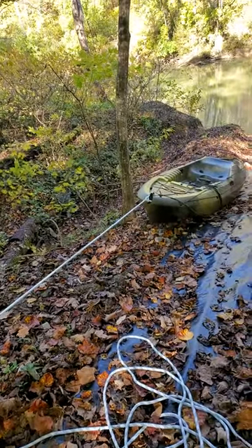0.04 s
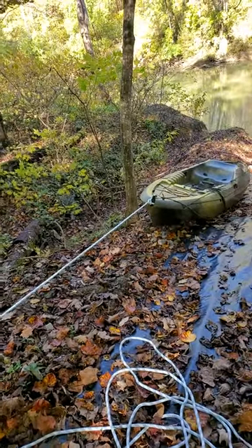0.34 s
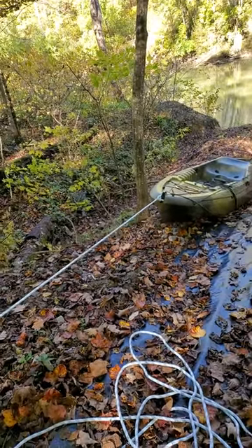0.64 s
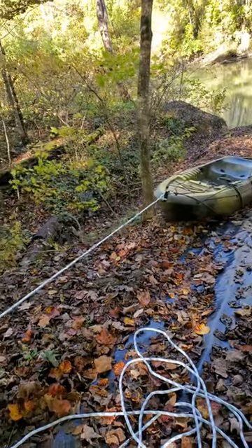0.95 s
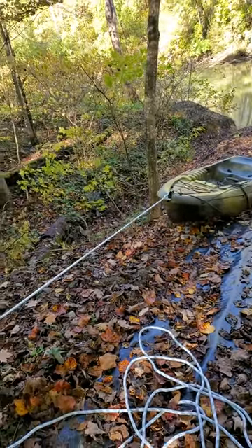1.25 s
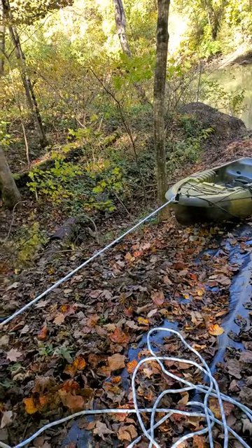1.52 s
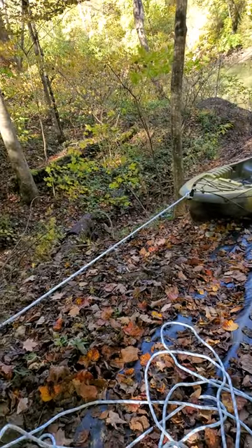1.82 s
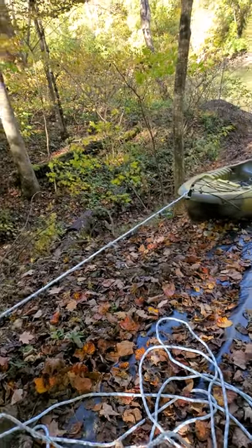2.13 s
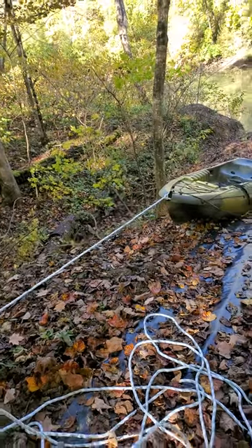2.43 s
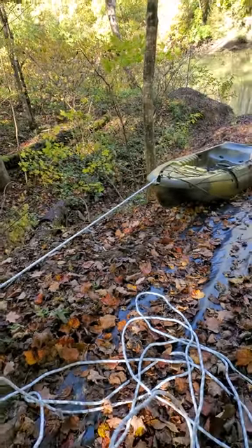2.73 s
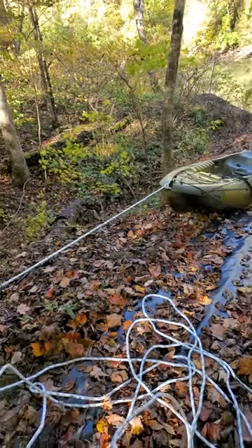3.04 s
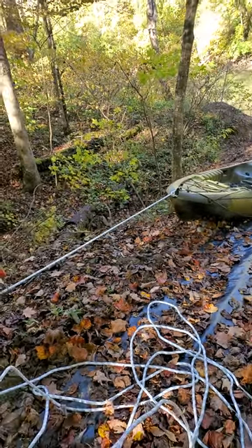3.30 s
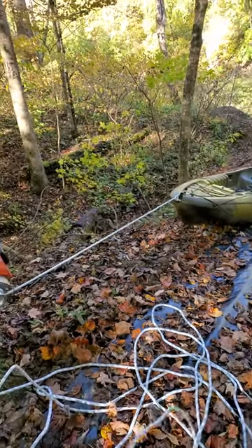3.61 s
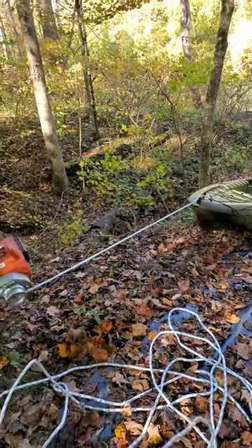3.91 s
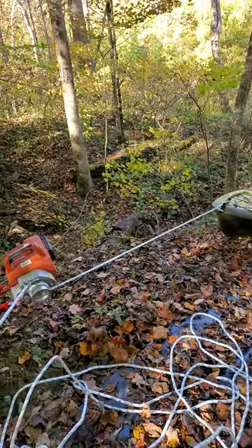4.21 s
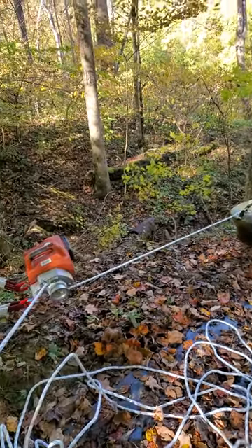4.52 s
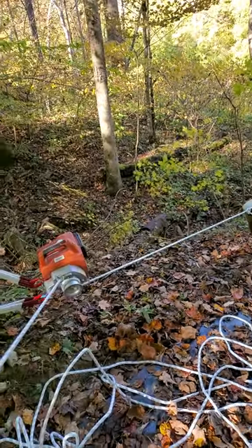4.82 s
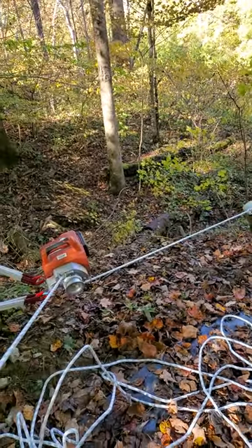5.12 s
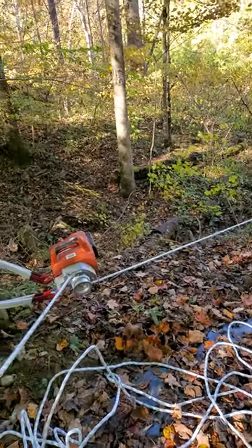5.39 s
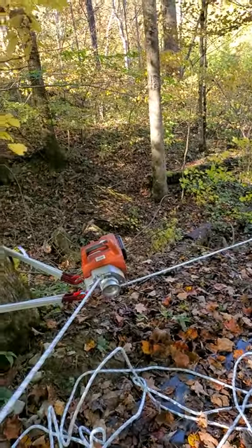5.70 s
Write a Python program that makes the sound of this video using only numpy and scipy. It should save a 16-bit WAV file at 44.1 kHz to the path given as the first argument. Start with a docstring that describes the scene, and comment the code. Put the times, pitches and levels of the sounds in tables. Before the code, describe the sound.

A battery winch runs throughout with a steady, throbbing whine and rasping gears as it hauls a boat up a creek bank. Midway the hull rubs faintly over the ground, the rope squeaks twice, the drum squeals thinly and a step crunches dry leaves and twigs. Light wind bumps the nearby hand-held microphone, and the whine shifts in tone as it turns toward the winch.

```python
"""A steady, throbbing whine: a battery capstan winch is hauling a boat up a leafy creek bank.
Its spinning rotor whines, its gears rasp once a turn and throb under the load, and a slower stage hums.
Midway the hull rubs over the ground, the rope squeaks, the drum squeals and a step crunches dry leaves.
The hand-held microphone swings round towards the winch while gusts buffet its two openings (ports)."""
import sys
import numpy as np
from scipy import signal
from scipy.fft import rfft, irfft
from scipy.io import wavfile
from scipy.ndimage import map_coordinates

SR = 44100
rng = np.random.default_rng(int(sys.argv[2]) if len(sys.argv) > 2 else 0)


def store_wav(level_fs):
    """Save 16-bit WAV to argv[1]."""
    pcm = np.round(np.clip(np.atleast_2d(level_fs), -1, 1) * 32767)
    wavfile.write(sys.argv[1], SR, pcm.T.astype(np.int16))


N = 253575
TIME = np.arange(N) / SR
FREQS = np.maximum(np.arange(N // 2 + 1) * SR / N, 1)
PAN = np.array([[.5], [-.5]])  # half goes to the left side, half is taken from the right


def from_db(db):
    """Turn decibels into a gain."""
    return 10 ** (np.asarray(db) / 20)

def rms_one(x):
    """Scale a signal to an average strength (rms) of 1."""
    return x / np.sqrt(np.mean(np.abs(x) ** 2) + 1e-20)

def in_time(rows):
    """Join a table's points over time, giving one curve per column."""
    times, *columns = np.transpose(rows)
    return [np.interp(TIME, times, column) for column in columns]

def by_hz(points):
    """Join a table's points over frequency."""
    hz, value = np.transpose(points)
    return np.interp(np.log(FREQS), np.log(hz), value)

def filtered(x, response):
    """Multiply each frequency of a signal by its own gain."""
    return irfft(rfft(x) * response, N)

def coloured(x, colour):
    """Give a signal the tone colour in a table, at strength 1."""
    return rms_one(filtered(x, from_db(by_hz(colour))))

def delayed(x, samples):
    """Delay a signal by an amount that changes over time."""
    return map_coordinates(x, [np.arange(N) - samples], order=3, mode="mirror")

def drift(rate):
    """A smooth random wander of strength 1; rate is roughly its changes per second."""
    r = np.exp(-40 * np.pi * rate / SR)
    slow = signal.lfilter([1], [1, -2 * r, r * r], rng.standard_normal(N // 20 + 2002))[2000:]
    return np.interp(np.arange(N) / 20, np.arange(len(slow)), rms_one(slow))

def swell(peak_s, half_width_s):
    """A rounded rise and fall of height 1."""
    return np.exp(-.5 * ((TIME - peak_s) / half_width_s) ** 2)

def swells(rows):
    """Add several swells into one loudness curve."""
    return sum(from_db(db) * swell(peak_s, half_width_s) for peak_s, half_width_s, db in rows)

def resonant_noise(hz, width_hz):
    """Stereo noise that rings around one pitch, at strength 1."""
    r = np.exp(-np.pi * width_hz / SR)
    feedback = [1, -2 * r * np.cos(2 * np.pi * hz / SR), r * r]
    return rms_one(signal.lfilter([1, 0, -1], feedback, rng.standard_normal((2, N))))


# Tone colour of air on the ports: frequency_hz, level_db
WIND_COLOUR = [(12, -26), (25, -7), (42, -3.5), (68, 1.5), (100, -3), (140, -10), (300, -53), (1000, -72)]
# Gusts: peak_s, half_width_s, level_db
WIND_GUSTS = [(.26, 0.031, -48), (.4, 0.067, -53), (.97, 0.019, -48), (1.8, 0.058, -46.5),
              (1.97, 0.047, -45), (2.27, 0.044, -41), (2.52, 0.038, -40), (2.69, 0.025, -36),
              (2.79, 0.03, -43), (3.09, 0.028, -48), (3.42, 0.076, -44.5), (3.6, 0.03, -34),
              (3.7, 0.058, -41.5), (3.79, 0.027, -44), (3.88, 0.018, -39), (3.99, .04, -51),
              (4.2, 0.044, -44), (4.34, 0.054, -51)]

def wind(breeze_db, flutter_db):
    """A light breeze and its gusts rumble in each port separately."""
    rumble = coloured(rng.standard_normal((2, N)), WIND_COLOUR)
    flow = from_db(breeze_db) + swells(WIND_GUSTS)
    return flow * from_db(flutter_db * drift(8)) * rumble


# Deep tone colour of a thump: frequency_hz, level_db
WIND_THUMP_COLOUR = [(15, -25), (32, -4), (48, 0), (70, -2), (100, -16), (200, -50), (500, -85)]
# Strong gusts: peak_s, half_width_s, level_db
WIND_THUMPS = [(2.245, .018, -36), (2.3, .02, -36), (2.59, .025, -33), (3.55, .015, -33), (3.61, .016, -28)]

def wind_thumps():
    """The strongest gusts hit the ports as short, deep thumps."""
    return swells(WIND_THUMPS) * coloured(rng.standard_normal((2, N)), WIND_THUMP_COLOUR)


# Hollow tone colour of the hull: frequency_hz, level_db
HULL_COLOUR = [(250, -39), (420, 8), (520, -1), (750, 5), (1000, -6), (1600, -13.5)]
# Drags over the bank: peak_s, half_width_s, level_db
HULL_DRAGS = [(2.151, 0.18, -34.5), (2.75, 0.24, -36.5)]

def hull_rub(uneven_db):
    """The boat's hull rubs unevenly over the ground."""
    rub = rng.standard_normal((2, N)) * from_db(uneven_db * drift(25))
    return swells(HULL_DRAGS) * coloured(rub, HULL_COLOUR)


# Tone colour of dry leaves: frequency_hz, level_db
CRACKLE_COLOUR = [(150, -7), (600, -12), (1900, 1), (3300, 0.5), (5000, 1), (8000, 0), (12000, -3),
                  (15500, 4.5)]

def leaves(step_s, step_db, stir_db, crackles_per_s, grain_db, clump_db):
    """Dry leaves stir faintly, then crush under a step in clumps of tiny crackles."""
    sizes = from_db(grain_db * np.minimum(rng.exponential(1, (2, N)), 4) + clump_db * drift(36))
    cracks = (rng.random((2, N)) < crackles_per_s / SR) * rng.choice([-1, 1], (2, N))
    rise_s, hold_s, fall_s = 0.071, 0.14, 0.26
    step = np.interp(TIME, step_s + np.cumsum([0, rise_s, hold_s, fall_s]), [0, 1, 1, 0])
    return (from_db(stir_db) + from_db(step_db) * step) * coloured(sizes * cracks, CRACKLE_COLOUR)


# Breaking twigs: start_s, level_db, pitch_hz
TWIG_SNAPS = [(2.758, -26, 13000), (2.843, -24, 12000), (2.908, -26, 2600), (2.911, -17, 13500),
              (2.9177, -14.5, 2300), (3.108, -20, 13500), (3.288, -19, 13000)]

def twig_snaps(fade_s):
    """Twigs and stalks break, each with a burst that falls 60 dB in fade_s."""
    out = 0
    for start_s, db, hz in TWIG_SNAPS:
        decay = (TIME >= start_s) * from_db(db - 60 * np.maximum(TIME - start_s, 0) / fade_s)
        out = out + decay * resonant_noise(hz, width_hz=2200)
    return out


# Slips of the rope: peak_s, half_width_s, level_db
ROPE_SLIPS = [(2.687, 0.01, -25), (3.076, 0.0079, -26)]

def rope_squeaks():
    """The rope squeaks as it slips briefly on the drum."""
    return swells(ROPE_SLIPS) * resonant_noise(hz=6280, width_hz=210)


# Notes at which the drum rings: pitch_hz, width_hz, level_db
DRUM_NOTES = [(6250, 60, -50), (6760, 55, -43), (7180, 55, -51), (6950, 70, -41)]

def drum_squeal(load_db, peak_s, half_width_s):
    """The loaded drum squeals for a while, pulsing with the load."""
    ringing = sum(from_db(db) * resonant_noise(hz, width)[0] for hz, width, db in DRUM_NOTES)
    return ringing * swell(peak_s, half_width_s) * from_db(load_db)


def gear_hum(turns, speed_ratio, level_db, pan_db, waver_db, sum_tone_db):
    """A slower gear stage hums, with a faint extra tone at its own pitch plus the rotor's."""
    angle = 2 * np.pi * turns
    tone = np.sin(speed_ratio * angle) + from_db(sum_tone_db) * np.sin((1 + speed_ratio) * angle)
    return np.sqrt(2) * tone * from_db(level_db + waver_db * drift(9.9) + pan_db * PAN)


# Overlapping cycles in the load make the gears throb and chatter: period_turns, depth_db, first_peak_turns
LOAD_CYCLES = [(47.96, 1.3, 25.4), (15.98, .66, 1.45), (34.28, .6, 29.9), (50.99, .5, 33.7),
               (16.06, .43, 15.4), (54.76, .33, 37.3), (19.98, .31, 5.6), (25.54, .28, 4.3), (8.01, .26, 3)]
# The teeth catch with a short chirr: peak_s, extra_load_db
TOOTH_CATCHES = [(.026, 2.5), (.076, 2.2), (.247, 5.5), (.298, 3.5), (.476, 3), (.649, 2.5), (.742, 4.5),
                 (1.079, 5), (1.178, 2.8), (1.263, 2), (1.405, 2), (1.438, 1), (1.497, 3), (1.832, 1),
                 (1.927, 3), (2.152, 2.5), (2.382, -2), (2.419, 2), (3.112, 0), (3.676, 1), (3.829, 5),
                 (4.983, 4), (5.521, 4), (5.585, 5.5)]

def gear_load(turns, uneven_db):
    """The load on the gears in dB around its average; each winch sound follows a share of it."""
    cycles = sum(db * np.cos(2 * np.pi * (turns - first) / period) for period, db, first in LOAD_CYCLES)
    bite = 0.04 * cycles ** 2  # teeth bite harder than they let go
    catches = sum(db * swell(peak_s, half_width_s=0.009) for peak_s, db in TOOTH_CATCHES)
    load_db = cycles + bite + catches + uneven_db * drift(21)
    return load_db - load_db.mean()


# How alike the two sides sound: frequency_hz, likeness_0_to_1
STEREO_LIKENESS = [(250, 1), (500, 0.81), (900, 0.98), (2500, 0.8), (4000, 0.73), (7000, 0.64),
                   (11500, 0.74), (14000, 0.45)]
# How much louder the left side is: frequency_hz, left_minus_right_db
STEREO_BALANCE = [(150, 5.5), (300, -5), (480, 7), (850, -7), (1500, -1), (2300, -3.5), (4500, -4.5),
                  (5300, 0), (7200, -0.5), (8200, 5.5), (9500, -1), (12500, -4), (14500, 6)]
# How much noise repeats from turn to turn: frequency_hz, share_0_to_1
TURN_REPEAT = [(300, .1), (1000, .12), (2200, .25), (2600, .33), (3000, .27), (3800, .34), (4700, .28),
               (5600, .3), (6500, .12), (15000, .1)]
# Pitches the housing boosts or dulls: pitch_hz, width_hz, boost_db
HOUSING_RESONANCES = [(679, 33, 9), (836, 9, 7), (1042, 200, 6), (1517, 230, 6), (2260, 270, 5),
                      (2830, 78, 2), (3810, 940, 6), (5552, 130, 7.5), (6100, 120, -2), (6245, 130, 7),
                      (6830, 160, 8), (6960, 190, 3), (7250, 92, 9), (11220, 220, 3), (11620, 270, 2.5),
                      (14000, 290, -18)]

def tooth_scrape(turns, colour, swell_db, pulse_db, uneven_db, pan_db):
    """Teeth scrape hardest once a turn, each turn with its own strength, and sound through the housing."""
    angle = 2 * np.pi * turns
    pulse = pulse_db * (np.cos(angle) + 0.3 * np.cos(2 * angle))
    strength = uneven_db * rng.standard_normal(N)[(turns + .5).astype(int)]
    shared, opposed = rfft(rng.standard_normal((2, N)) * from_db(pulse + strength + swell_db))
    alike = by_hz(STEREO_LIKENESS)
    pair = np.sqrt(1 + alike) * shared + np.sqrt(1 - alike) * opposed * [[1], [-1]]
    # The same teeth meet on every turn, so the noise gathers round the rotor's harmonics.
    turn_s = TIME[-1] / turns[-1]
    comb = 1 / (1 - by_hz(TURN_REPEAT) * np.exp(-2j * np.pi * FREQS * turn_s))
    housing_db = sum(db / (1 + (2 * (FREQS - hz) / width) ** 2) for hz, width, db in HOUSING_RESONANCES)
    gain = from_db(by_hz(colour) + housing_db + (by_hz(STEREO_BALANCE) + pan_db) * PAN)
    return rms_one(irfft(pair * comb * gain, N))


# Tone colours of the four gear noises: frequency_hz, level_db
GRIND_COLOUR = [(100, -24.5), (190, -9.5), (260, 1.5), (330, -3.5), (430, -2), (520, -3.5), (680, 0),
                (1000, -3.5), (1550, 5), (1950, -0.5), (2800, 4.5), (3900, 0.5), (4900, 0), (6000, -11.5)]
RASP_COLOUR = [(3000, -18.5), (5200, -13.5), (6100, -1), (7000, -2.5), (7700, -1.5), (8700, -7),
               (10500, -15.5)]
SIZZLE_COLOUR = [(7300, -16.5), (8200, -2), (9500, 3), (12500, 1), (14000, 9.5), (16000, -4)]
DRUM_COLOUR = [(8000, -25), (10100, -4), (11100, -3), (11600, -0.5), (12100, -6.5), (13000, -34),
               (14000, -39)]
# How each rises and falls: time_s, grind_db, rasp_db (before its trim), sizzle_db, drum_db
GEAR_LEVELS = [(0, -23, -19.5, -28.5, -26), (.5, -24, -23, -28.5, -25), (1.7, -24, -19, -27, -28),
               (2.8, -25.5, -23.5, -29, -28.5), (3.6, -25.5, -21.5, -26.5, -30.5),
               (4.5, -26.5, -23.5, -29, -37), (5, -26.5, -21, -29.5, -49), (5.75, -25.5, -21, -29.5, -46)]

def gear_train(turns, load_db):
    """Low grind, shrill rasp, fine sizzle and the ringing drum all swell with the load."""
    grind_db, rasp_db, sizzle_db, drum_db = in_time(GEAR_LEVELS)
    grind = tooth_scrape(turns, GRIND_COLOUR, 0.18 * load_db + 0.35 * drift(36),
                         pulse_db=0.84, uneven_db=1.27, pan_db=0.3)
    rasp = tooth_scrape(turns, RASP_COLOUR, 0.3 * load_db + drift(40),
                        pulse_db=3.0, uneven_db=1.15, pan_db=-1.2)
    sizzle = tooth_scrape(turns, SIZZLE_COLOUR, 1.17 * load_db + drift(70),
                          pulse_db=0.5, uneven_db=2.0, pan_db=-5.0)
    drum = tooth_scrape(turns, DRUM_COLOUR, 1.35 * load_db + 0.69 * drift(70),
                        pulse_db=3.5, uneven_db=1.0, pan_db=-3.0)
    treble = from_db(rasp_db - 2.5) * rasp + from_db(sizzle_db) * sizzle
    return from_db(grind_db) * grind + treble + from_db(drum_db) * drum


# Echo off the ground: time_s, delay_ms
GROUND_ECHO = [(0, 4.83), (2.6, 4.58), (3.2, 4.9), (5.75, 4.85)]

def with_ground_echo(pair, echo_db):
    """One quick bounce off the ground strengthens some pitches and weakens others."""
    samples = in_time(GROUND_ECHO)[0] * SR / 1000
    return pair + from_db(echo_db) * np.array([delayed(side, samples) for side in pair])


# Extra lag at the left port: frequency_hz, lag_radians
LEFT_PORT_LAG = [(150, 0), (195, 0), (250, 0.58), (420, 1.6), (700, 0.87), (2000, 0.68), (4000, 0)]

def at_microphone(pair, lag_samples):
    """The winch stands to one side, so its sound reaches the left port later."""
    left = filtered(pair[0], np.exp(-1j * by_hz(LEFT_PORT_LAG)))
    return np.array([delayed(left, lag_samples), pair[1]])


# How far the microphone has moved: time_s, distance_cm
MICROPHONE_PATH = [(0, -0.5), (.45, 1), (.85, 3.5), (1.5, 5.5), (2, 10.5), (2.7, 14), (3.3, 17.5),
                   (4.2, 19), (5, 21), (5.75, 21.5)]
# Loud spots in the air: harmonic, spacing_cm, left_depth_db, right_depth_db, left_spot_cm, right_spot_cm
STANDING_WAVES = [(1, 9.0, 1.5, 2.2, 8.1, 2.1), (2, 10.4, 3.0, 1.9, 8.7, 9.6),
                  (3, 12.6, 2.8, 2.3, 8.9, 11.5), (4, 7.6, 2.4, 1.9, 4.6, 4.8),
                  (5, 8.8, 1.6, 0.6, 1.7, 8.6), (6, 8.0, 1.5, 3.0, 3.0, 4.1),
                  (7, 17.6, 2.1, 1.2, 3.5, 12.6), (8, 10.8, 1.8, 2.1, 7.8, 8.1),
                  (9, 5.2, 1.0, 2.0, 1.9, 0.9), (10, 12.8, 2.0, 2.3, 9.0, 5.4),
                  (11, 9.0, 1.3, 1.1, 7.2, 6.0), (12, 10.6, 1.6, 0.8, 8.6, 7.7),
                  (13, 7.4, 1.5, 0.4, 2.7, 5.7), (14, 8.4, 0.9, 1.3, 6.2, 7.1)]

def standing_wave_db(harmonic):
    """A harmonic swells as each port moves through the loud spots of its standing wave."""
    path_cm, = in_time(MICROPHONE_PATH)
    _, spacing_cm, *ports = STANDING_WAVES[harmonic - 1]
    depth_db, spot_cm = np.reshape(ports, (2, 2, 1))
    return depth_db * np.cos(2 * np.pi * (path_cm - spot_cm) / spacing_cm)


# Brief swells and dips: harmonic, peak_s, half_width_s, left_db, right_db
HARMONIC_SWELLS = [(1, 3.16, 0.28, 2, -6), (1, 4.43, 0.44, 5.5, 3.5), (2, 2.02, 0.17, 5, 4),
                   (3, 2.3, .12, 0.5, -8), (3, 5.43, 0.32, 4, 3.5), (4, 0.91, 0.34, 9, 7),
                   (4, 2.2, .2, -1, 0), (4, 2.9, 0.26, 11, 11.5), (5, 2.75, 0.26, -4.5, 4),
                   (6, 0.4, 0.22, 1, -1), (6, 2.9, 0.12, -5, -10), (7, 3.39, 0.29, -1, 9.5),
                   (8, 4.1, 0.25, 4, 12.5), (6, 2.3, 0.29, 1, 6.5), (9, 0.16, 0.3, 7, 10.5),
                   (2, .7, .6, -1.5, -2), (13, 4.3, .4, 11.5, 8)]

def harmonic_swell_db(harmonic):
    """Single tones of the whine briefly swell or dip on each side."""
    return sum(np.outer(sides_db, swell(peak_s, half_width_s))
               for number, peak_s, half_width_s, *sides_db in HARMONIC_SWELLS if number == harmonic)


# Rotor tones (harmonics: multiples of its speed) before and after the microphone swings: harmonic,
# left_before_db, right_before_db, left_after_db, right_after_db, lag_before_radians, lag_after_radians
ROTOR_HARMONICS = [(1, -40, -43.5, -44.5, -45.5, 4, 0.3), (2, -48.5, -37.5, -46, -37.5, 2, 1),
                   (3, -37.5, -36.5, -48, -36, 3.5, 1.2), (4, -44, -40.5, -43, -43.5, 2, 1.6),
                   (5, -37, -32, -38, -32.5, 3.5, 2), (6, -31, -39, -37.5, -33.5, 4, 1.4),
                   (7, -38.5, -44, -47, -35.5, -3, -5), (8, -37, -41, -41, -41, -1.3, -4.5),
                   (9, -38, -38.5, -46, -43, -1.66, -2), (10, -46, -36.5, -42, -42, -1, -2),
                   (11, -52, -46, -51, -40, -2, -1.5), (12, -42, -54, -54, -51, 0, 1),
                   (13, -37.5, -50, -48.5, -49, -0.5, -1), (14, -43, -46, -40, -45, -0.8, -0.8)]
# Gear wheels that shake the tones: period_turns, relative_depth
SHAKING_WHEELS = [(48, .2), (24, .17), (16, .26), (8, .12), (7.59, .16)]
# Throb from the carrier of the planet gears, for harmonics 1, 2, 3 and all higher: depth_0_to_1
THROB_DEPTHS = [.35, .72, .35, .1]
TURNS_PER_THROB, TURNS_PER_WOBBLE = 48, 16

def rotor_whine(turns, swing, load_db, boost_db, flutter, shimmer_db, wobble):
    """The rotor whines; the carrier makes low tones throb, while wheels, slack and grit roughen high ones."""
    out = np.zeros((2, N))
    carrier = np.exp(-2j * np.pi * (turns / TURNS_PER_THROB - .73))
    wheels = [depth * np.exp(2j * np.pi * turns / period) for period, depth in SHAKING_WHEELS]
    for harmonic, *levels, lag_before, lag_after in ROTOR_HARMONICS:
        before, after = np.reshape(levels, (2, 2, 1))
        tone_db = before + swing * (after - before)
        tone_db += standing_wave_db(harmonic) + harmonic_swell_db(harmonic)
        left_lag = lag_before + swing * (lag_after - lag_before)
        ports = [np.exp(-1j * left_lag), 1]
        # Each wheel adds a side tone just above and just below the harmonic.
        phases = np.exp(2j * np.pi * rng.random((len(wheels), 2)))
        side_tones = sum(up * wheel + down * wheel.conj() for wheel, (up, down) in zip(wheels, phases))
        shake = wobble * harmonic ** 0.22 * side_tones
        # The planet gears shift two harmonics down to a side tone.
        multiple = harmonic - (harmonic in (12, 13)) / TURNS_PER_WOBBLE
        tone = np.exp(2j * np.pi * (multiple * turns + rng.random()))
        throb = THROB_DEPTHS[min(harmonic, len(THROB_DEPTHS)) - 1] * carrier
        grit = .1 * (harmonic - 1) * (drift(90) + 1j * drift(90))
        slack = flutter * harmonic ** 0.93 * (drift(25) + 1j * drift(15))
        tone *= rms_one(1 + throb + shake + grit + slack)
        for side in range(2):
            gain_db = tone_db[side] + load_db + shimmer_db * drift(1.4)
            out[side] += from_db(gain_db) * (tone * ports[side]).real
    return np.sqrt(2) * from_db(boost_db) * out


# The rotor's nearly steady speed: time_s, turns_per_s
ROTOR_SPEED = [(0, 428.7), (1, 428.4), (2, 428.68), (2.45, 428.15), (3.05, 428.95), (4.5, 428.92),
               (5.25, 429.42), (5.75, 429.43)]
# The microphone swings towards the winch: time_s, swing_0_to_1, left_lag_samples
MICROPHONE_SWING = [(0, 0, 7.2), (1.8, 0, 6.45), (2, .03, 6.1), (2.65, 0, 5.6), (2.85, 0.33, 4.8),
                    (4.5, 1, 3.8), (5.75, 1, 3.2)]

def scene():
    """One rotor drives the winch's sounds; the rope, the bank and the wind join in."""
    turns = np.cumsum(in_time(ROTOR_SPEED)[0]) / SR
    swing, lag_samples = in_time(MICROPHONE_SWING)
    load_db = gear_load(turns, uneven_db=0.86)
    gears = with_ground_echo(gear_train(turns, load_db), echo_db=-11.0)
    whine = rotor_whine(turns, swing, 0.21 * load_db,
                        boost_db=0.85, flutter=0.094, shimmer_db=0.5, wobble=0.56)
    squeal = drum_squeal(0.6 * load_db, peak_s=2.7, half_width_s=0.3)
    hum = gear_hum(turns, speed_ratio=.4222, level_db=-42.5, pan_db=-2, waver_db=0.94, sum_tone_db=-15.5)
    bank = leaves(step_s=2.69, step_db=-22, stir_db=-47, crackles_per_s=7700, grain_db=4, clump_db=1.5)
    bank += twig_snaps(fade_s=0.027) + hull_rub(uneven_db=1.5)
    winch = at_microphone(gears + squeal + hum, lag_samples) + whine + rope_squeaks()
    air = wind(breeze_db=-56.5, flutter_db=2.5) + wind_thumps()
    return air + bank + winch

def record(dry):
    """Cut off the very highest treble steeply."""
    cutoff_hz = 15760
    return signal.sosfilt(signal.ellip(18, .1, 90, cutoff_hz, fs=SR, output="sos"), dry)


dry = scene()
out = record(dry)
store_wav(out)
```